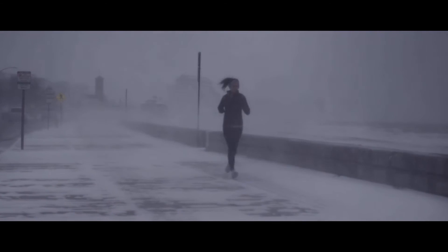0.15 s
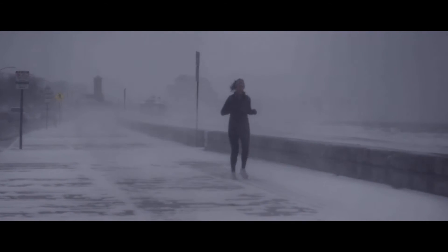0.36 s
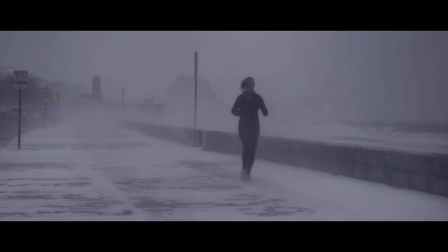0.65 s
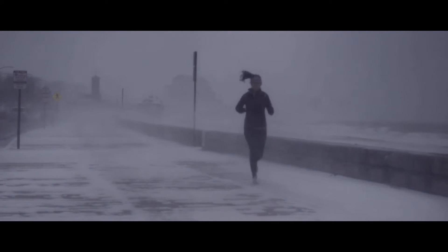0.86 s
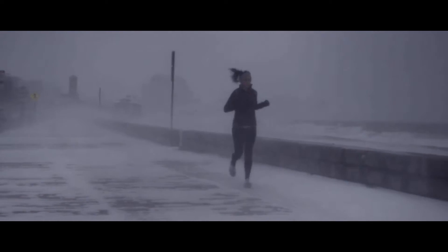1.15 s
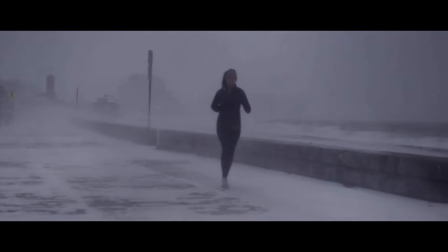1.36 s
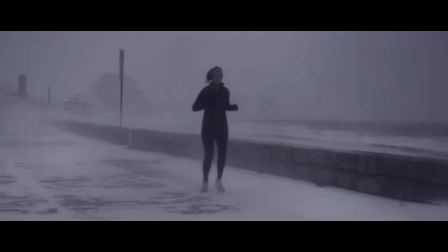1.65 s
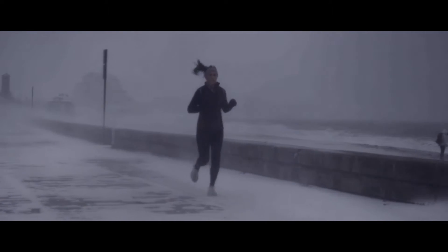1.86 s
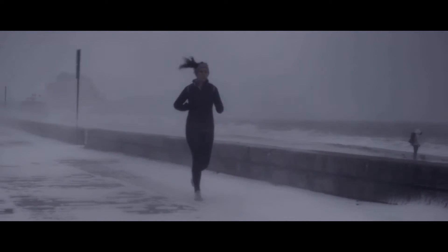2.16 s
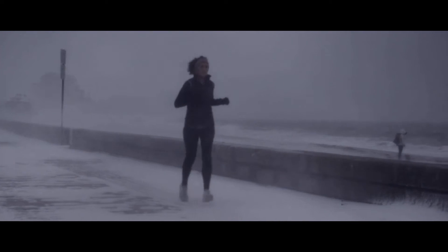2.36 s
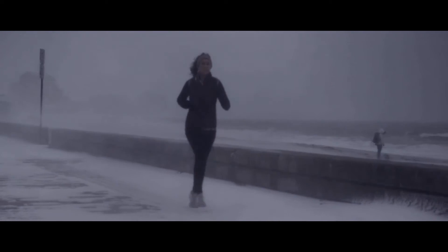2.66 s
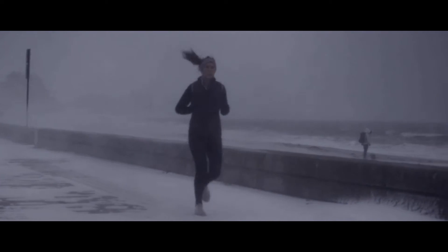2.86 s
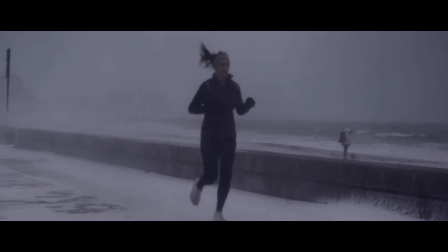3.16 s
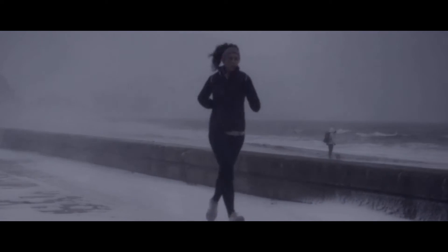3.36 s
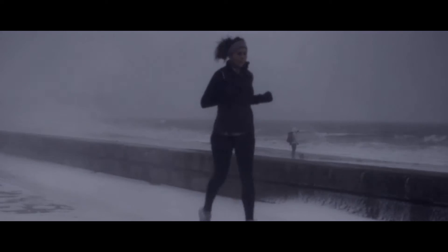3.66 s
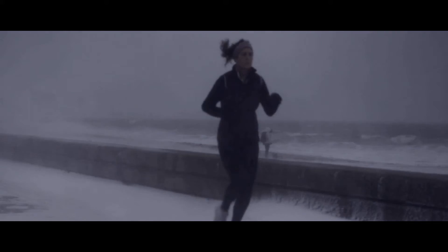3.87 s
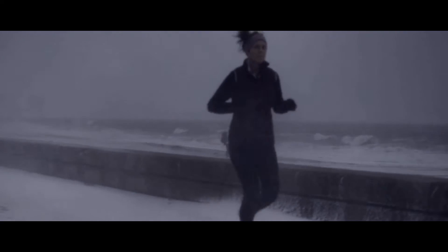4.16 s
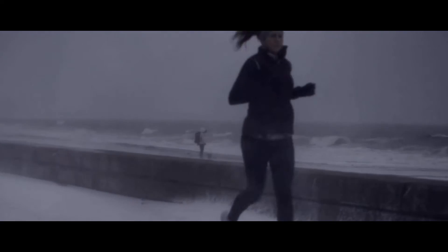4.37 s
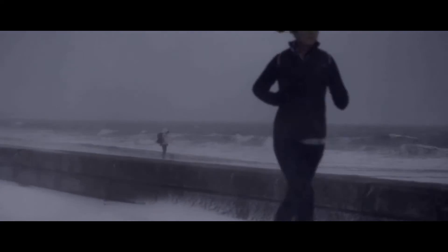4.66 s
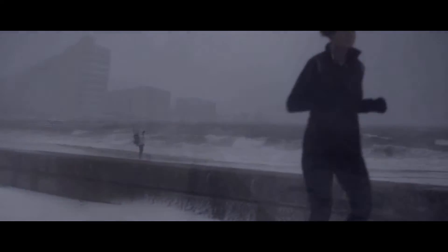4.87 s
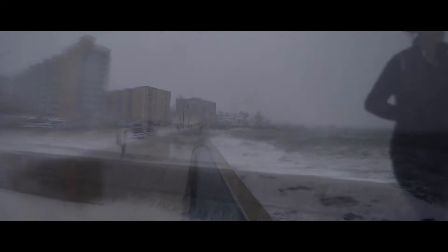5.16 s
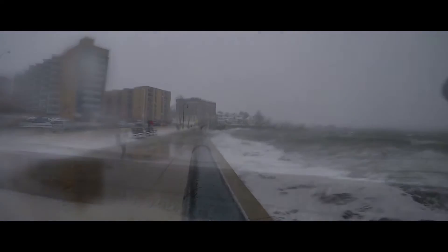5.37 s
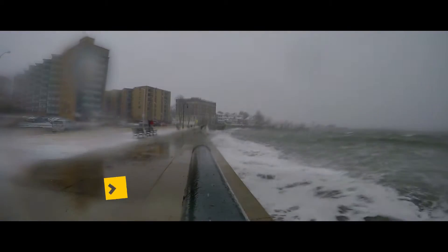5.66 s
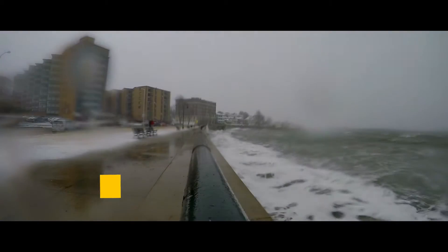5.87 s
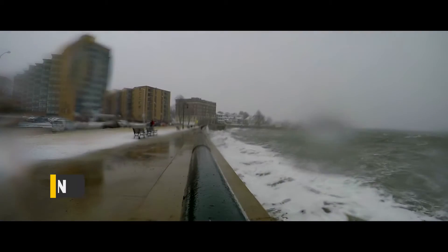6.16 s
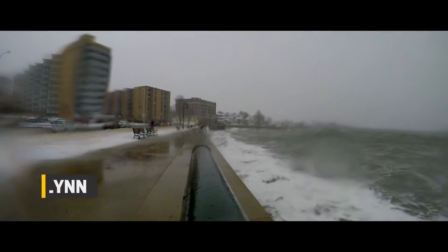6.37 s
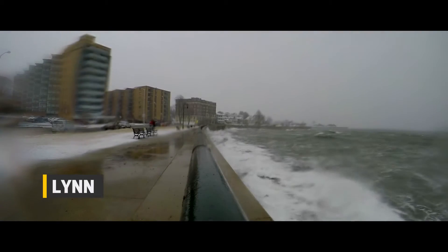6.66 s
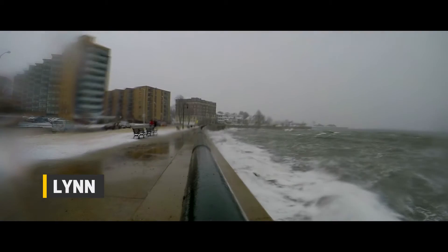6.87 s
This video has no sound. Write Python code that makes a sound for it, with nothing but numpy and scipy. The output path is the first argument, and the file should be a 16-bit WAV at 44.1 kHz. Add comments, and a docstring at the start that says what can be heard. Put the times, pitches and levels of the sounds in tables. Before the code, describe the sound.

From the start, strong storm wind buffets a small outdoor microphone, making a lumpy low rumble with a rough, flickering roar above it. Harder shoves of air thud in the first half second, around 1.3 seconds and several times between 2.9 and 4 seconds. Throughout the first five seconds a stiff plastic cover crackles and snaps in small, sharp, irregular pops, with a faint fizz of blown snow between them. At about 5.3 to 5.5 seconds the sound fades over to a microphone inside a housing. The rumble continues, the snaps stop and the crackle softens. Sleet ticks brightly on the housing, and surf comes through only as a very faint, high hiss. Short rasping blasts of wind build, strongest around 6.3, 6.6 and 7 seconds, and the last one carries a brief, faint, fuzzy high whistle.

```python
"""Storm wind on a sea wall

Wind buffets a small microphone with a lumpy rumble and a rough roar. Gusts flex a stiff plastic
cover, which crackles and snaps, and blown snow fizzes. Late on, the sound fades over to a second,
boxed-in microphone: faint surf, rough blasts, sleet ticking on its housing and a final whistle."""
import sys
import numpy as np
from scipy import signal
from scipy.fft import rfft, irfft
from scipy.io import wavfile

SR = 44100
rng = np.random.default_rng(int(sys.argv[2]) if len(sys.argv) > 2 else 0)


def unload_wav(signal):
    """Save mono or channel-first audio to the path in sys.argv[1] as 16-bit WAV at rate SR, clipped to [-1, 1]."""
    wavfile.write(
        sys.argv[1],
        SR,
        np.round(np.clip(np.atleast_2d(signal).T, -1, 1) * 32767).astype(np.int16),
    )


N = 309131
T = np.arange(N) / SR
CHANGE_S = 5.3, 5.5  # start and end of the fade from the first microphone to the second

# How strong the wind is. Each row: time in seconds, buffeting level in dB, roar level in dB.
WIND_LEVELS = [(0.0, -20, -33.5), (0.6, -19, -34), (0.66, -24.5, -34.5), (0.88, -18, -34.5),
               (0.96, -24, -36.5), (1.21, -24.5, -34), (1.25, -18.5, -33.5), (1.56, -22, -33),
               (1.85, -20, -30.5), (1.99, -26, -37), (2.24, -24, -37), (2.32, -16.5, -28.5),
               (2.44, -24.5, -37.5), (2.58, -19.5, -32), (2.75, -23.5, -34), (2.85, -16, -35.5),
               (3.14, -25, -36.5), (3.36, -15.5, -30), (3.53, -29.5, -38), (3.79, -21.5, -31),
               (3.8, -16.5, -30.5), (4.02, -25.5, -39), (4.06, -20.5, -35), (4.12, -22.5, -33),
               (4.69, -21, -32), (5.35, -23.5, -38), (5.41, -30.5, -42.5), (5.46, -20, -32.5),
               (5.93, -29, -36.5), (6.01, -18, -33.5), (6.25, -25.5, -33.5), (6.31, -16, -27),
               (6.46, -30, -40.5), (6.66, -13, -28), (6.79, -20.5, -33.5), (7.01, -13, -21)]
# The tone of a hard gust on the boxed-in microphone. Each row: frequency in Hz, relative level in dB.
HARD_GUST_TONE = [(180, -33), (300, -4), (524, 0), (926, -1.5), (1060, -7), (1500, -8), (1690, -9),
                  (2480, -12.5), (3900, -25.5), (5070, -46), (8580, -120)]


def amp(db):
    """Turns decibels into a number to multiply a sound by."""
    return 10 ** (np.asarray(db) / 20)


def evened(x):
    """Scales a sound to an average (rms) level of 1."""
    return x / np.sqrt(np.mean(x ** 2) + 1e-20)


def between(ends, share):
    """The value a given share of the way from one end to the other."""
    return ends[0] + (ends[1] - ends[0]) * share


def curve(rows, column=1):
    """One column of a table of times, read at every sample."""
    rows = np.array(rows)
    return np.interp(T, rows[:, 0], rows[:, column])


def filtered(x, tone):
    """Turns each frequency up or down, following rows of frequency in Hz and gain in dB."""
    row_hz, db = np.transpose(tone)
    hz = np.fft.rfftfreq(N, 1 / SR)
    gain = amp(np.interp(np.log(hz + 1), np.log(row_hz + 1), db))
    return irfft(rfft(x) * gain, N)


def coloured(x, tone):
    """Gives a sound a tone and an average level of 1."""
    return evened(filtered(x, tone))


def wander(top_hz):
    """A smooth random wobble of average size 1, mostly slower than top_hz."""
    hz = np.fft.rfftfreq(N, 1 / SR)
    spectrum = rfft(rng.standard_normal(N)) / (1 + (hz / top_hz) ** 2)
    return evened(irfft(spectrum * (hz > 3), N))


def band(hz, width_hz):
    """Noise around one frequency."""
    tone = [(hz + step * width_hz, db) for step, db in [(-3, -60), (-1, -8), (0, 0), (1, -8), (3, -60)]]
    return coloured(rng.standard_normal(N), tone)


def ring(hz, ring_ms, t, sag=0.):
    """A tone that starts with a pull and fades 60 dB in ring_ms; sag makes its pitch sink."""
    return -np.sin(2 * np.pi * hz * t / (1 + sag * t * 1000)) * amp(-60 * t * 1000 / ring_ms)


def add(mix, start_s, sound):
    """Adds a short sound into the mix."""
    part = mix[round(start_s * SR):][:len(sound)]
    part += sound[:len(part)]


def buffeting(lumps):
    """Swirls of air push the microphone's thin diaphragm; slow and quick ones swell separately."""
    # The tone of the rumble. Each row: frequency in Hz, relative level in dB.
    rumble_tone = [(8.8, -41), (15, -16.5), (53, 4), (92, 3.5), (412, -11.5), (700, -27), (910, -29.5),
                   (1540, -120)]
    noise = coloured(rng.standard_normal(N), rumble_tone)
    slow = signal.sosfiltfilt(signal.butter(2, 110, fs=SR, output="sos"), noise)
    quick = noise - slow
    uneven = slow * amp(0.26 * wander(top_hz=30)) + quick * amp(3.22 * lumps)
    return amp(curve(WIND_LEVELS)) * evened(uneven)


def roar(lumps):
    """Small swirls ride on the large ones and flicker faster; in the box, hard gusts change the tone."""
    # The roar on the first microphone. Each row: frequency in Hz, relative level in dB.
    open_tone = [(180, -14.5), (300, -5.5), (440, 0), (662, -8.5), (1210, -13), (1420, -13), (2030, -13),
                 (4530, -35), (7000, -50), (9100, -65), (15400, -120)]
    # Light wind on the boxed-in microphone. Each row: frequency in Hz, relative level in dB.
    light_wind_tone = [(180, -9.5), (300, -9.5), (423, -8), (595, -3.5), (670, -6), (828, -6.5),
                       (2310, -16), (7000, -54.5), (9100, -54), (15400, -120)]
    level_db = curve(WIND_LEVELS, column=2)
    boxed = np.interp(T, CHANGE_S, [0, 1])
    hard = np.clip((level_db + 26) / 23, 0, 1)  # 0 in light wind, rising in strong gusts
    flicker_db = 2.4 * lumps + (1 + 0.5 * boxed) * wander(top_hz=114)
    noise = rng.standard_normal(N) * amp(flicker_db)
    outside = coloured(noise, open_tone)
    inside = (1 - hard) * coloured(noise, light_wind_tone) + hard * coloured(noise, HARD_GUST_TONE)
    return amp(level_db) * (np.sqrt(1 - boxed) * outside + np.sqrt(boxed) * inside)


def crackle(base_per_s=1100, spread_db=7.5):
    """Clumps of tiny creases in the cover let go, dull or bright; fine snow fizzes between them."""
    # How hard the cover crackles and the snow fizzes. Each row: time in seconds, relative level in dB.
    strength = [(0, -53.5), (.17, -60.5), (.28, -58.5), (.38, -66.5), (.47, -59), (.6, -72), (.8, -58.5),
                (.92, -66.5), (1.03, -57), (1.08, -66), (1.19, -55.5), (1.27, -62.5), (1.39, -56),
                (1.62, -60), (1.74, -51.5), (1.8, -67.5), (1.92, -69), (1.96, -62.5), (2.05, -67.5),
                (2.22, -81.5), (2.28, -58), (2.4, -68.5), (2.58, -61.5), (2.7, -71.5), (2.84, -67),
                (3.0, -66), (3.08, -61), (3.13, -68), (3.3, -62), (3.36, -55), (3.58, -63.5), (3.63, -68.5),
                (3.79, -53.5), (3.92, -73), (4.09, -65.5), (4.2, -68), (4.3, -63.5), (4.47, -79.5),
                (4.6, -62), (5.1, -63.5), (5.4, -62.5), (5.68, -58.5), (5.95, -65), (6.17, -58.5),
                (6.4, -73.5), (6.7, -65), (7.01, -74)]
    # The tone of the creases. Each row: frequency in Hz, gain in dB.
    crease_tone = [(500, -21), (1500, -2), (3500, 0.5), (5000, -2), (7200, -11.5), (10000, -9.5),
                   (15000, -19), (16500, -29)]
    # The tone of the blown snow. Each row: frequency in Hz, relative level in dB.
    snow_tone = [(1500, 0), (3500, 11), (5000, -1.5), (7200, -3), (10000, -6.5), (15000, -13), (16500, -37)]
    chance = base_per_s / SR * amp(4.5 * wander(top_hz=13))
    sizes = amp(spread_db * np.minimum(rng.exponential(1, N), 4))
    clicks = sizes * (rng.random(N) < chance)
    kind = rng.integers(0, 16, N)  # each click sets off one of 16 bursts, from bright to dull
    bursts, t = np.zeros(N), np.arange(128) / SR
    for k, noise in enumerate(rng.standard_normal((16, 128))):
        dulled = signal.lfilter([1], [1, -.04 * k], noise)
        burst = evened(dulled) * amp(-60 * t / .003)
        bursts += signal.oaconvolve(clicks * (kind == k), burst)[:N]
    fizz = rng.standard_normal(N) * amp(3.5 * wander(top_hz=250))
    box_db = np.interp(T, CHANGE_S, [0, -7])  # the box makes the creases quieter
    creases = amp(box_db + 18.5) * coloured(bursts, crease_tone)
    snow_db = 8.5 + 0.23 * (curve(WIND_LEVELS, column=2) + 32.5)  # partly follows the roar
    snow = amp(snow_db) * coloured(fizz, snow_tone)
    return amp(curve(strength)) * (creases + snow)


def shoves(width_cycles=0.39):
    """Hard shoves of air swing the diaphragm out and back; returns the sound and its smooth swells."""
    # The hardest shoves. Each row: middle in seconds, level in dB, swing frequency in Hz.
    pushes = [(0.026, -6, 83.5), (0.266, -7, 95), (0.358, -5.5, 96), (0.421, -12.5, 87), (0.516, -7.5, 81),
              (0.585, -7.5, 106), (0.586, -2, 265), (1.242, -10.5, 296), (1.281, -8, 102),
              (1.361, -4.5, 121), (1.878, -14, 90), (1.878, -10.5, 208), (2.863, -8, 294), (2.866, -7, 109),
              (3.034, -8.5, 285), (3.347, -5.5, 95), (3.386, -8, 105), (3.804, -10.5, 258), (3.817, -6, 93),
              (4.051, -10, 77), (6.612, -10, 225), (6.659, -15, 256), (6.724, -8.5, 91), (6.971, -10, 101),
              (6.985, -7, 219)]
    out, swells, t = np.zeros(N), np.zeros(N), np.arange(-1000, 1000) / SR
    for middle_s, db, hz in pushes:
        swell = np.exp(-.5 * (t * hz / width_cycles) ** 2)
        add(out, middle_s + t[0], -amp(db) * np.sin(2 * np.pi * hz * t) * swell)
        add(swells, middle_s + t[0], swell)
    return out, np.minimum(swells, 1)


def snaps(small_per_s=4, small_db=(-23.5, -18), small_hz=(900, 4050), small_ring_ms=4.2):
    """The cover snaps: a sharp click, a ring that sinks as the plastic slackens, a rattle and a thump."""
    # The loud snaps. Each row: start in seconds, ring level in dB, starting pitch in Hz,
    # ring time in milliseconds, click level in dB, thump level in dB.
    loud = [(0.1359, -6.5, 3100, 3.6, -4, -22), (0.139, -4, 3800, 1.9, -41, -37),
            (0.1652, -9.5, 4340, 2.3, -36, -33), (0.2512, -11, 1120, 3.1, -13, -36),
            (0.2846, -6.5, 1700, 1.4, -15, -37), (0.336, -8, 4100, 1.4, -12, -42),
            (0.5846, -18, 895, 7.7, -46, -34), (0.8118, -4, 1580, 0.95, -43, -41),
            (0.8232, -3.5, 3600, 2, -4, -10), (1.0525, -10.5, 1100, 14, -65, -41),
            (1.0564, -10, 876, 14, -66, -36), (1.2586, -5, 1970, 1.7, -43, -27),
            (1.4244, -4.5, 1020, 2.4, -13, -30), (1.4568, -12.5, 3800, 4.5, -13, -44),
            (1.4807, -8.5, 2100, 4.2, -41, -40), (1.5468, -5.5, 900, 2.6, -18, -17),
            (1.723, -5.5, 990, 1.6, -13, -32), (1.7257, -9, 1410, 3.4, -42, -38),
            (1.9049, 2.5, 1430, 2.8, -17, -10.5), (1.952, -9, 3550, 1.9, -10, -14),
            (2.0618, -15, 1850, 4.5, -51, -44), (2.4473, 1, 3760, 2.6, -4, -34),
            (2.5375, 1, 1550, 2.3, -34, -46), (2.5528, -3, 3400, 2.1, -7, -33),
            (2.5562, -15, 1850, 10, -45, -31), (2.6564, -14, 4500, 4.3, -12, -11),
            (2.7319, -8, 945, 3.4, -45, -13), (2.8294, -3.5, 3160, 1.24, -46, -19),
            (2.9174, -11.5, 2420, 1.9, -27, -23), (3.1458, -4, 1670, 4.1, -39, -30),
            (3.1548, 1.5, 2630, 1.6, -39, -21), (3.166, -12, 2420, 3.5, -50, -24),
            (3.2095, -15, 1530, 7.1, -51, -25), (3.2198, -3, 1920, 1.7, -39, -24),
            (3.2276, -9, 3140, 4.9, -30, -14), (3.2424, 3.5, 2350, 1.14, -34, -4),
            (3.3192, -9.5, 1420, 6, -46, -35), (3.3231, -5, 3800, 3.8, -19, -24),
            (3.4008, -15.5, 2540, 5.4, -35, -27), (3.4473, -11, 1320, 4.2, -33, -10.5),
            (3.5656, -7.5, 1920, 0.92, -23, -34), (3.7848, -7, 3300, 1.9, -14, -35),
            (3.8372, -12, 2720, 4.7, -33, -34), (3.878, 4, 1200, 2.4, -37, -7),
            (3.9009, -1.5, 4080, 1.4, -9, -12), (3.9852, 2.5, 1670, 1.2, -49, -11),
            (4.1602, -3.5, 1480, 4.4, -47, -22), (4.2237, -8.5, 930, 5.6, -53, -34),
            (4.2321, -17, 2450, 7.5, -41, -21), (4.5669, -18.5, 2130, 6.1, -20, -27),
            (4.5825, -7.5, 3740, 1.6, -43, -32), (4.6208, -8, 2730, 3.1, -46, -37),
            (4.6996, -4, 2570, 1.3, -45, -25), (4.7714, -4.5, 2300, 1.8, -42, -40),
            (4.8291, 2.5, 2480, 1.9, -2, -11.5), (4.8853, -9.5, 4700, 2.3, -16, -43),
            (4.9179, -6.5, 1880, 1.4, -45, -14), (4.9693, -9.5, 1380, 3.4, -9, -43),
            (5.0107, -10.5, 1260, 3, -47, -11.5), (5.1402, -3.5, 2650, 1.4, -56, -13),
            (5.187, -8, 1060, 1.8, -11.5, -27), (5.1937, -1.5, 3400, 1.2, -41, -11.5),
            (5.3619, -1.5, 2880, 1.9, -7.5, -11)]
    small = []  # these come at random, on the first microphone only
    for when, size, pitch in rng.random((round(small_per_s * CHANGE_S[0]), 3)):
        hz = np.exp(between(np.log(small_hz), pitch))
        small.append((when * CHANGE_S[0], between(small_db, size), hz, small_ring_ms, -40, -38))
    out, t = np.zeros(N), np.arange(900) / SR
    fade_in = np.sin(np.pi / 2 * np.minimum(t / 0.0001, 1)) ** 2
    for start_s, db, hz, ring_ms, click_db, thump_db in small + loud:
        noise = rng.standard_normal(len(t))
        rattle = signal.lfilter([.2], [1, -1.5, .6], noise) * amp(-60 * t / 0.0093)
        rattle_db = -9.5 - 0.6 * ring_ms  # long rings are cleaner
        plastic = (ring(hz, ring_ms, t, sag=0.05) + amp(rattle_db) * rattle) * fade_in
        click = ring(hz=8800, ring_ms=0.62, t=t) + .5 * noise * amp(-60 * t / 0.0005)
        thump = ring(hz=540, ring_ms=14.3, t=t) * np.minimum(t / 0.00028, 1)
        add(out, start_s, amp(db) * plastic + amp(click_db) * click - amp(thump_db) * thump)
    return out


def surf():
    """The surf comes through the housing as a thin, high hiss."""
    # How loud the hiss is. Each row: time in seconds, level in dB.
    levels = [(5.3, -83), (5.5, -69), (6.35, -61.5), (6.45, -67), (7.01, -69)]
    return amp(curve(levels)) * band(hz=9300, width_hz=1400) * (T > levels[0][0])


def blasts(rise_s=0.013, fade_s=0.062):
    """Gusts hit the box in short, rasping bursts of roar."""
    # The blasts. Each row: start in seconds, relative level in dB.
    bursts = [(5.434, -38), (5.484, -30), (5.622, -17.5), (5.648, -18.5), (5.783, -16.5), (6.01, -19),
              (6.04, -20), (6.079, -15.5), (6.143, -21), (6.188, -18), (6.28, -14.5), (6.317, -9),
              (6.637, -4.5), (6.701, -10.5), (6.787, -15.5), (6.849, -31), (6.912, -16), (6.962, -1)]
    loudness, t = np.zeros(N), np.arange(3000) / SR
    for start_s, db in bursts:
        add(loudness, start_s, amp(db - 60 * t / fade_s) * np.minimum(t / rise_s, 1))
    rasp = rng.standard_normal(N) * amp(4.6 * wander(top_hz=200))
    return loudness * coloured(rasp, HARD_GUST_TONE)


def sleet(faint_per_s=8.1, faint_db=(-44, -41), faint_splat_db=-6.5, settle_hz=(3800, 4500)):
    """Each grain rings the housing, chirps down to near its lowest note and adds a bright splat."""
    # The clear strikes. Each row: start in seconds, relative level in dB, splat gain on top of that in dB.
    clear = [(5.47, -28.5, -8), (5.558, -32, -24), (5.6623, -33, -3), (5.703, -29, -0.5),
             (5.7815, -21.5, -8), (5.795, -23, -12), (5.834, -28, -23), (5.8541, -31, -14),
             (5.8875, -33, -12), (5.9038, -32, -3), (5.979, -30, -18), (6.0142, -30, -14),
             (6.047, -26.5, -7), (6.063, -23, -20), (6.284, -33, -5), (6.3225, -30, -6), (6.356, -35, -5),
             (6.6222, -22.5, -7), (6.6657, -28, -14), (6.6925, -28, -18), (6.7142, -29, -18),
             (6.7411, -30, -19), (6.781, -29, -2.5), (6.8119, -34, -16), (6.841, -24.5, -19),
             (6.8444, -24.5, -21), (6.8783, -27.5, -26), (6.9503, -15.5, -38), (6.9646, -15.5, -34)]
    # The housing's own notes. Each row: pitch in Hz, relative level in dB, ring time in milliseconds.
    notes = [(3860, 9.5, 4), (6100, -11, 9.6)]
    out, t = np.zeros(N), np.arange(900) / SR
    housing = sum(amp(db) * ring(hz, ring_ms, t) for hz, db, ring_ms in notes)
    fade_in = np.sin(np.pi / 2 * np.minimum(t / 0.00081, 1)) ** 2
    span_s = CHANGE_S[1], T[-1]
    faint_count = round(faint_per_s * (span_s[1] - span_s[0]))
    faint = [(between(span_s, when), between(faint_db, size), faint_splat_db)
             for when, size in rng.random((faint_count, 2))]
    strikes = faint + clear
    for (start_s, db, splat_db), pitch in zip(strikes, rng.random(len(strikes))):
        hz = between(settle_hz, pitch) * (1 + 0.79 * np.exp(-t / 0.00077))
        chirp = np.sin(2 * np.pi * np.cumsum(hz) / SR) * amp(-60 * t / 0.01)
        hiss = signal.lfilter([1, 0, -1], [1, -1.1, .6], rng.standard_normal(len(t)))
        splat = hiss * amp(splat_db - 60 * t / 0.0067)
        add(out, start_s, amp(db) * (chirp + splat + housing) * fade_in)
    return out


def whistle():
    """The last gust blows a fuzzy tone across a gap."""
    # How loud the whistle is. Each row: time in seconds, level in dB.
    levels = [(6.91, -77), (6.935, -55), (6.975, -40), (7.01, -46)]
    return amp(curve(levels)) * band(hz=6200, width_hz=400) * (T > levels[0][0])


def scene():
    """Adds the wind, the cover, the sleet and the surf into one channel."""
    lumps = wander(top_hz=19.6)  # large swirls, shared by the rumble and the roar
    pushes, swells = shoves()
    rumble = buffeting(lumps) * (1 - .6 * swells) + pushes  # a shove sweeps smaller swirls aside
    wind = rumble + roar(lumps) + blasts() + whistle()
    return (wind + crackle() + snaps() + sleet() + surf())[None]


def record(dry, ceiling=.72, top_hz=16400):
    """The microphone flattens the loudest peaks, softens the treble and cuts the very highest sounds."""
    # The microphone's tone. Each row: frequency in Hz, gain in dB.
    microphone_tone = [(20, -0.5), (6000, 0), (10000, -6), (14000, -8), (17000, -12)]
    clipped = np.clip(dry[0], -ceiling, ceiling)
    duller = filtered(clipped, microphone_tone)
    high_cut = signal.firwin(511, top_hz, window=("kaiser", 9), fs=SR)
    return signal.oaconvolve(duller, high_cut, "same")[None]


dry = scene()
out = record(dry)
unload_wav(out)
```